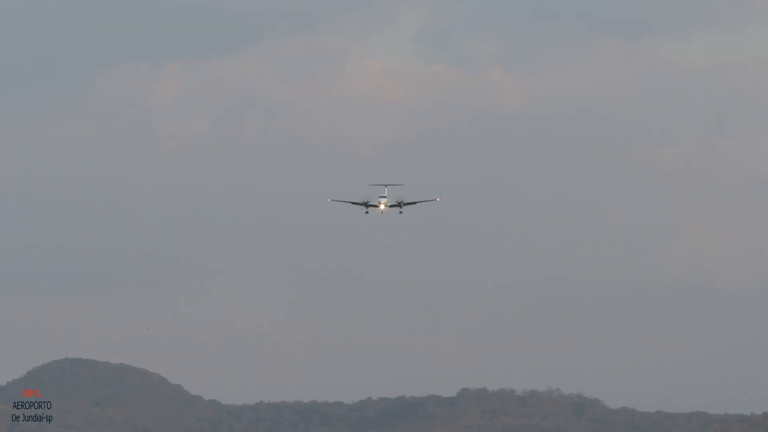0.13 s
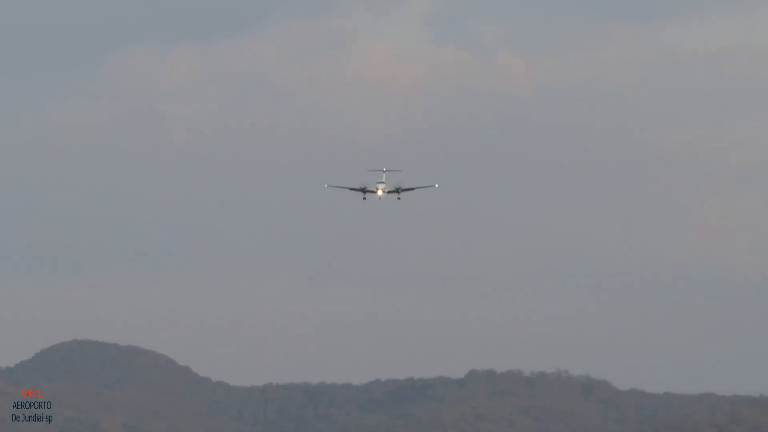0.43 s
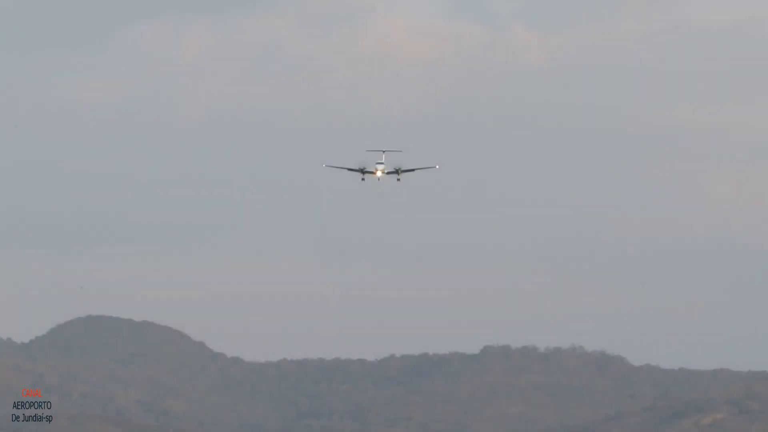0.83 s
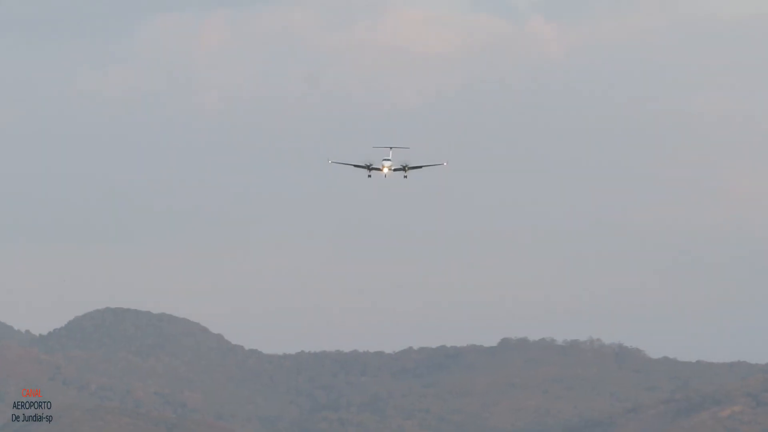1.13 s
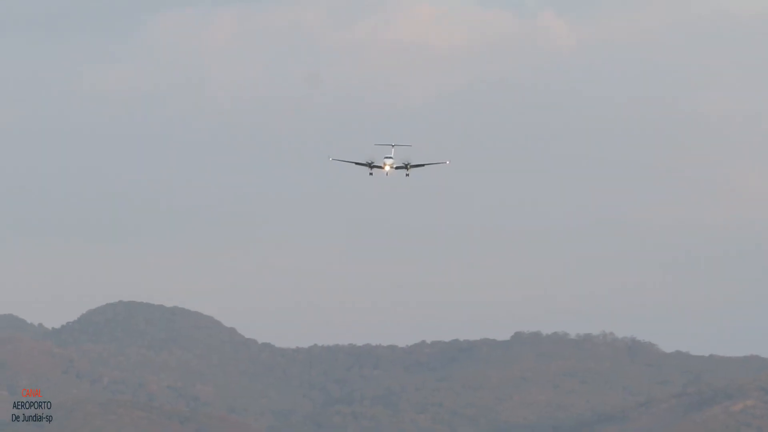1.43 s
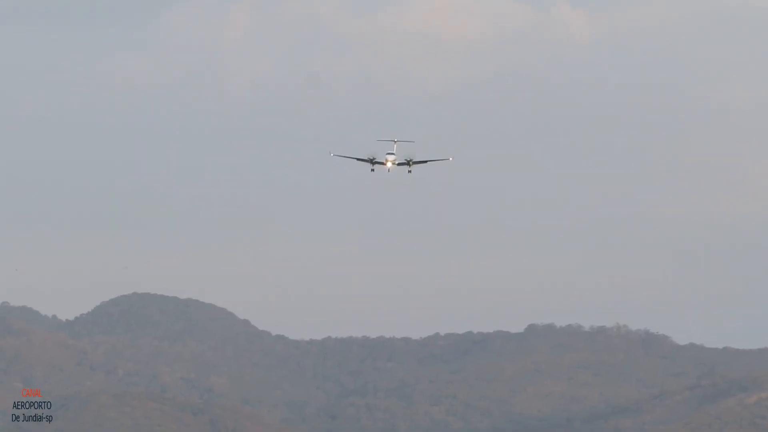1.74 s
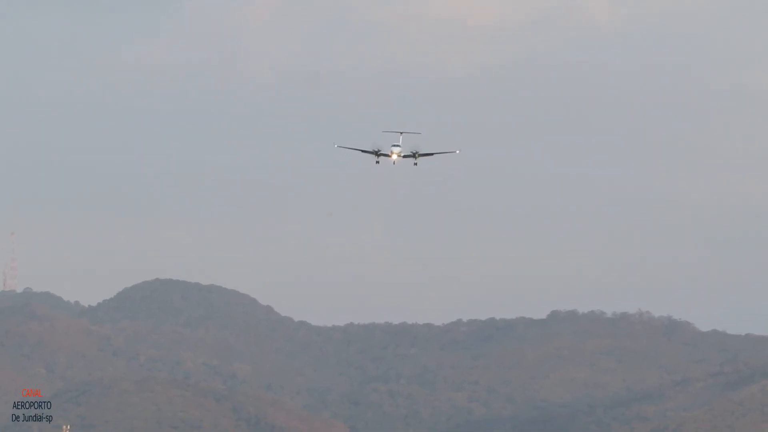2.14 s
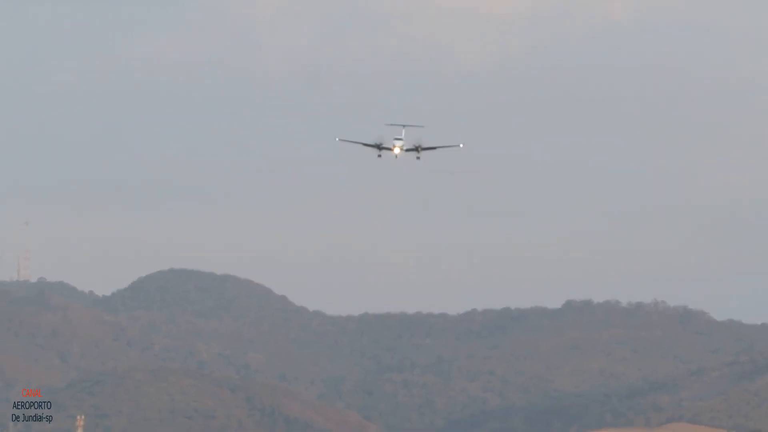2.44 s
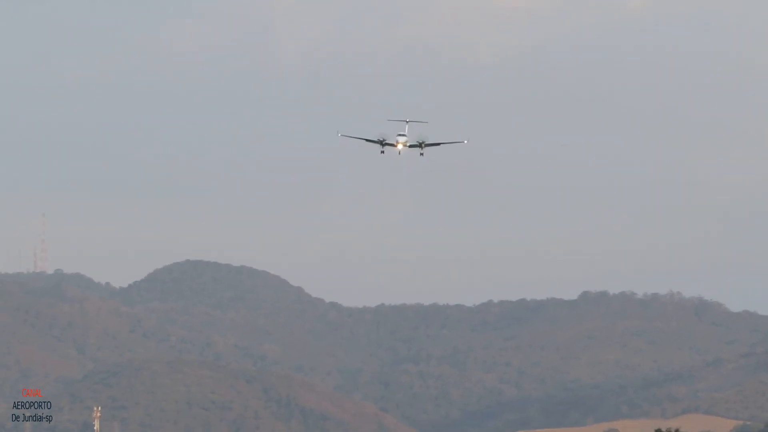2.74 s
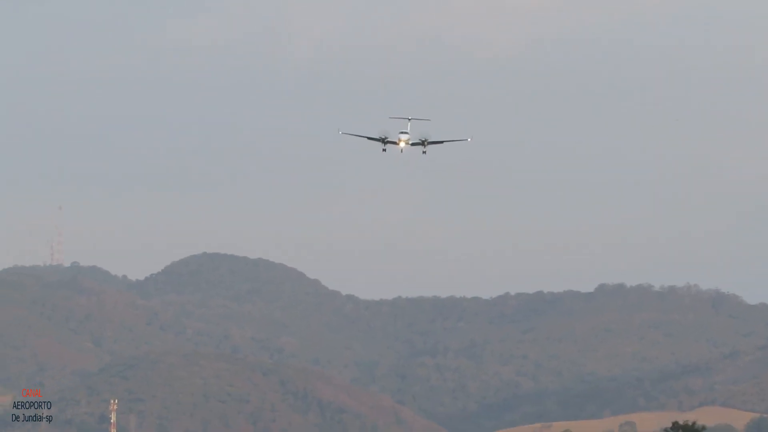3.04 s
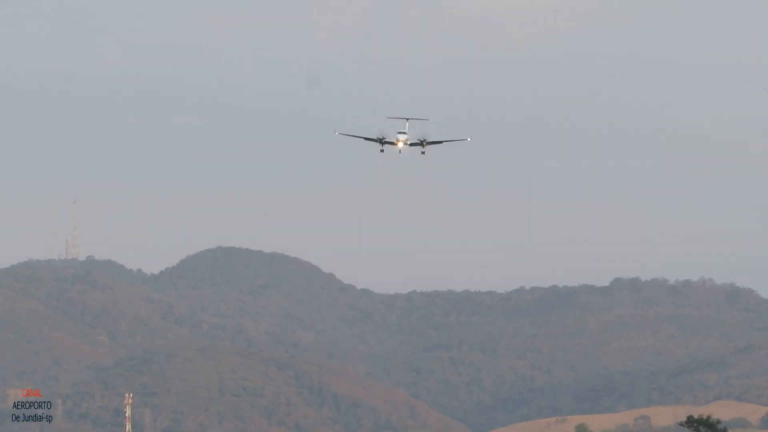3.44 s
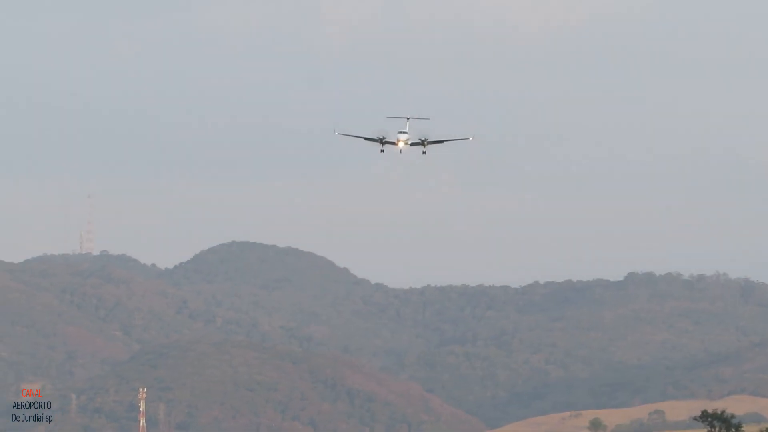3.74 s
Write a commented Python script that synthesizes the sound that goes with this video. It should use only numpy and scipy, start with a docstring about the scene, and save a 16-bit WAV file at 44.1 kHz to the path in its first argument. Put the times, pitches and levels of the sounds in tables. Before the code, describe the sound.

A twin-propeller aircraft approaches outdoors, its broad roar and low rumble starting abruptly and swelling, with blade hum and shimmering turbine whine; faint bird chirps and soft stereo microphone hiss.

```python
"""A broad roar and low rumble start abruptly and come up over the first second and a half: a propeller aircraft.
Roar, rumble and microphone hiss are shaped stereo noise; blade hum and a wavering low hum are gliding sines.
A turbine whine, steady in pitch and shimmering in level, and its octave are sines with drifting level.
A small bird calls twice, sines that climb and slide down with an echo; a very faint high tone lies underneath."""
import sys
import numpy as np
from scipy import signal
from scipy.fft import rfft, irfft, next_fast_len
from scipy.io import wavfile

SR = 44100
rng = np.random.default_rng(int(sys.argv[2]) if len(sys.argv) > 2 else 0)


def file_out(sig):
    """Save sig as 16-bit WAV at sys.argv[1]."""
    # one column per channel
    cols = np.atleast_2d(sig).T
    # limit, then scale
    lim = np.clip(cols, -1, 1)
    pcm = np.round(lim * 32767).astype(np.int16)
    wavfile.write(sys.argv[1], SR, pcm)


N = 171549


def from_db(db):
    """Decibels to amplitude gain."""
    return 10 ** (np.asarray(db) / 20)


def rms_one(x):
    """Scale to unit rms."""
    return x / np.sqrt(np.mean(x ** 2) + 1e-20)


def in_time(rows):
    """Columns of a table after the first (seconds), interpolated to one value per sample."""
    row_s, *columns = np.transpose(rows)
    t_s = np.arange(N) / SR
    return [np.interp(t_s, row_s, column) for column in columns]


def at_hz(points, hz):
    """Read a table on a log-frequency axis."""
    point_hz, values = np.array(points).T
    return np.interp(np.log(hz + 1), np.log(point_hz), values)


def drift(corner_hz):
    """Slow random wander of about unit rms: noise through a double pole at corner_hz."""
    step = 40  # samples per slow sample
    warmup = 2000
    pole = np.exp(-2 * np.pi * corner_hz * step / SR)
    noise = rng.standard_normal(N // step + warmup + 2)
    slow = signal.lfilter([1], [1, -2 * pole, pole * pole], noise)[warmup:]
    return np.interp(np.arange(N) / step, np.arange(len(slow)), rms_one(slow))


def pair(lean_db):
    """Left and right gains, lean_db apart, averaging one."""
    left, right = from_db(lean_db / 2), from_db(-lean_db / 2)
    return np.array([left, right]).reshape(2, -1) * 2 / (left + right)


def tone(hz, lead_rad=0):
    """Stereo sine of rms 1 on a pitch curve; the left phase leads by lead_rad."""
    phase = 2 * np.pi * np.cumsum(hz + np.zeros(N)) / SR
    return np.sqrt(2) * np.sin(phase + lead_rad * np.array([[.5], [-.5]]))


# Stereo image of the noise. Each row: frequency in Hz, left-right correlation.
LIKENESS = [(60, .99), (210, .98), (320, .97), (490, .76), (750, .7), (1150, .65), (1750, .77), (2670, .5),
            (4070, .02), (14400, 0)]
# Each row: frequency in Hz, left minus right in dB.
NOISE_LEAN = [(80, 1), (140, -5.5), (210, 2.5), (320, 0), (490, -5), (750, 2), (1150, -0.5), (1750, 0),
              (14400, 0)]
# Each row: frequency in Hz, phase by which left leads in rad.
NOISE_LEAD = [(130, 0), (430, -.6), (1380, .4), (2240, -.4), (2580, .2), (2930, -.5), (15000, 0)]


def coloured(spectrum, flicker_db):
    """Stereo noise: shared and opposed parts set the correlation; band-limited, flickering, mid rms 1."""
    size = next_fast_len(N)
    hz = np.fft.rfftfreq(size, 1 / SR)
    left_plus = np.array([[1], [-1]])
    mid, side = rfft(rng.standard_normal((2, size)))
    alike = np.clip(at_hz(LIKENESS, hz), -1, 1)
    both = np.sqrt(1 + alike) * mid + np.sqrt(1 - alike) * side * left_plus
    both = both * from_db(at_hz(spectrum, hz))
    both = both * pair(at_hz(NOISE_LEAN, hz))
    both = both * np.exp(.5j * at_hz(NOISE_LEAD, hz) * left_plus)
    in_band = (hz > spectrum[0][0]) & (hz < spectrum[-1][0])
    noise = irfft(both * in_band, size)[:, :N]
    noise = noise * from_db(flicker_db * drift(8))
    return noise / noise.mean(axis=0).std()


# Levels of the roar's three humps. Each row: time in seconds, low, middle and upper level in dB.
ROAR_LEVEL = [(.07, -33.5, -48, -55), (.5, -34, -45.5, -53.5), (1.0, -30, -43, -51.5),
              (1.4, -28, -40.5, -48), (1.8, -27.5, -41, -48.5), (2.2, -28.5, -39.5, -48.5),
              (2.6, -27, -39, -47.5), (3.0, -28.5, -40, -47.5), (3.4, -28.5, -39, -46.5),
              (3.89, -28, -37.5, -45.5)]
# Levels of the low hump's lower flank, the valley above it and a throaty strand inside it.
# Each row: time in seconds, level in dB.
FLANK_LEVEL = [(.07, -47.5), (1.0, -42), (1.8, -42), (2.5, -37.5), (3.2, -32.5), (3.89, -34)]
VALLEY_LEVEL = [(.07, -51.5), (.9, -46.5), (2.0, -46.5), (3.0, -44.5), (3.89, -48)]
STRAND_LEVEL = [(1.0, -53), (1.4, -32.5), (2.1, -38), (2.6, -49)]
# Noise spectra of the six layers. Each row: frequency in Hz, relative density in dB per Hz.
LOW_ROAR = [(80, -1), (110, -10), (150, -8.5), (200, -6.5), (260, -2), (330, 1.5), (420, -5), (520, -15.5),
            (640, -30.5), (800, -59)]
MIDDLE_ROAR = [(600, -15), (750, -5), (850, 1), (950, 2), (1080, -1), (1230, -5.5), (1350, -3),
               (1500, -20.5), (1800, -43)]
UPPER_ROAR = [(1200, -15), (1500, -1), (1750, 1.5), (2100, 0.5), (2600, -7), (3200, -13), (3800, -18),
              (5000, -41)]
FLANK = [(130, -11), (170, -6), (220, 7.5), (270, 5.5), (330, -37)]
VALLEY = [(450, -20), (540, 0), (750, 0), (900, -20)]
STRAND = [(295, -15), (325, 0), (360, -15)]


def roar():
    """Broad noise of propellers and airframe: three humps, a flank, a valley and a strand."""
    low_db, middle_db, upper_db = in_time(ROAR_LEVEL)
    layers = [
        (low_db, LOW_ROAR),
        (middle_db, MIDDLE_ROAR),
        (upper_db, UPPER_ROAR),
        (in_time(FLANK_LEVEL)[0], FLANK),
        (in_time(VALLEY_LEVEL)[0], VALLEY),
        (in_time(STRAND_LEVEL)[0], STRAND),
    ]
    return sum(from_db(db) * coloured(spectrum, flicker_db=.6) for db, spectrum in layers)


# Rumble level. Each row: time in seconds, level in dB.
RUMBLE_LEVEL = [(.07, -39), (.5, -41.5), (1.0, -37.5), (1.5, -38), (2.0, -38.5), (2.5, -37.5), (3.0, -35.5),
                (3.5, -34.5), (3.89, -41)]
# Rumble spectrum. Each row: frequency in Hz, relative density in dB per Hz.
RUMBLE = [(20, -5), (35, 1.5), (48, 9.5), (57, 7), (70, 9), (82, 11.5), (100, 3), (130, -5), (180, -48)]


def rumble():
    """Low noise, 20 to 180 Hz, under the roar."""
    level_db, = in_time(RUMBLE_LEVEL)
    return from_db(level_db) * coloured(RUMBLE, flicker_db=.6)


# Blade hum. Each row: time in seconds, pitch in Hz, level in dB.
BLADES = [(.07, 128.5, -48.5), (.5, 128.3, -37), (1.2, 128, -39.5), (1.6, 127.5, -47), (2.0, 127.2, -42),
          (2.5, 126.8, -33.5), (3.0, 125.8, -33.5), (3.6, 125.5, -32.5), (3.89, 124, -34)]
BLADE_LEAN_DB, BLADE_WAVER_DB, BLADE_WAVER_HZ = 2.5, 1.5, 3.6


def blades():
    """Blade-passing hum: a sine that sinks a little in pitch and wavers in level."""
    hz, level_db = in_time(BLADES)
    level_db = level_db + BLADE_WAVER_DB * drift(BLADE_WAVER_HZ)
    return from_db(level_db) * pair(BLADE_LEAN_DB) * tone(hz)


# Low hum that swells and sinks. Each row: time in seconds, pitch in Hz, level in dB.
THROB = [(.07, 67, -45), (.8, 74, -42), (1.1, 73.2, -44), (1.25, 74.9, -42), (1.5, 75.4, -39),
         (1.8, 77.3, -52), (2.1, 70.8, -40), (2.4, 70.3, -37), (2.57, 70.5, -29), (2.75, 70, -49),
         (2.92, 70, -28), (3.08, 69.3, -46), (3.28, 69, -29.5), (3.43, 68.5, -40), (3.6, 68, -29),
         (3.72, 68, -39), (3.89, 67.8, -29)]


def throb():
    """Wavering low hum under the blades: one sine on pitch and level curves."""
    hz, level_db = in_time(THROB)
    return from_db(level_db) * tone(hz)


# Shimmer of the whine. Each row: time in seconds, level in dB.
WHINE_LEVEL = [(0.07, -41), (0.11, -49), (0.15, -38.5), (0.27, -45), (0.36, -38), (0.46, -42), (0.52, -35),
               (0.65, -46), (0.75, -38), (0.8, -44.5), (0.84, -38), (1.01, -35), (1.1, -40), (1.135, -61),
               (1.18, -41.5), (1.25, -37), (1.57, -31), (1.63, -28), (1.72, -28), (1.8, -50), (1.84, -40),
               (1.86, -33), (1.91, -36), (1.94, -31.5), (2.07, -37.5), (2.17, -28), (2.25, -30),
               (2.41, -39), (2.43, -50), (2.46, -43), (2.51, -63), (2.54, -33.5), (2.57, -34), (2.68, -39),
               (2.81, -34.5), (2.87, -48.5), (2.965, -37), (3.0, -34.5), (3.1, -32.5), (3.15, -34.5),
               (3.19, -45), (3.22, -33), (3.25, -32.5), (3.31, -42), (3.42, -39), (3.48, -31), (3.61, -34),
               (3.67, -36.5), (3.86, -40.5), (3.89, -42)]
# Stereo lean of the whine. Each row: time in seconds, left minus right in dB.
WHINE_LEAN = [(.07, 1), (.4, 8), (.6, 5), (.85, 10), (1.1, 6), (1.5, 9), (2.0, 6), (3.0, 5), (3.3, 10),
              (3.55, 3), (3.89, 2)]
# The octave comes and goes. Each row: time in seconds, level in dB.
OCTAVE_LEVEL = [(0.07, -57), (0.23, -75), (0.46, -73), (0.49, -58), (0.8, -59), (0.84, -74), (0.99, -64),
                (1.04, -75), (1.18, -60), (1.28, -72), (1.32, -56.5), (1.6, -63.5), (2.45, -66),
                (2.62, -56.5), (2.85, -54), (2.87, -75), (3.11, -60), (3.24, -72), (3.3, -52.5),
                (3.42, -57), (3.54, -75), (3.61, -59), (3.86, -68), (3.89, -71)]
WHINE_HZ, WHINE_WANDER_HZ = 1304.3, 1.0
WHINE_LEAD_RAD, WHINE_LEAD_WANDER_RAD = .8, .6
WHINE_FLUTTER_DB, OCTAVE_FLUTTER_DB, FLUTTER_HZ = .7, 2.5, 15
OCTAVE_LEAN_DB = 4


def whine():
    """Turbine tone and octave; moving air bends the path, so the phase drifts between microphones."""
    level_db, = in_time(WHINE_LEVEL)
    lean_db, = in_time(WHINE_LEAN)
    octave_db, = in_time(OCTAVE_LEVEL)
    hz = WHINE_HZ + WHINE_WANDER_HZ * drift(2.42)
    lead_rad = WHINE_LEAD_RAD + WHINE_LEAD_WANDER_RAD * drift(1.36)
    level_db = level_db + WHINE_FLUTTER_DB * drift(FLUTTER_HZ)
    octave_db = octave_db + OCTAVE_FLUTTER_DB * drift(FLUTTER_HZ)
    fundamental = from_db(level_db) * pair(lean_db) * tone(hz, lead_rad)
    octave = from_db(octave_db) * pair(OCTAVE_LEAN_DB) * tone(2 * hz, lead_rad)
    return fundamental + octave


# Microphone hiss as the gain comes up. Each row: time in seconds, level in dB.
HISS_LEVEL = [(.07, -64.5), (.5, -62), (.9, -61.5), (1.4, -58.5), (2.5, -58.5), (3.89, -59)]
# Hiss spectrum. Each row: frequency in Hz, relative density in dB per Hz.
HISS = [(800, -20), (2000, -4), (3500, 0), (7400, -1), (8300, -5), (10500, -7), (12500, -11), (13800, -15),
        (14450, -21), (14550, -30), (15200, -32)]


def hiss():
    """Noise of the microphone pair, nearly uncorrelated in the treble."""
    level_db, = in_time(HISS_LEVEL)
    return from_db(level_db) * coloured(HISS, flicker_db=.2)


def faint_tone():
    """Very faint, steady high sine."""
    return from_db(-93) * tone(13169)


# Bird calls. Each row: time of the top in seconds, fall in seconds, top pitch in Hz, fall rate in Hz per s,
# level in dB before the blur, rise level relative to the top in dB before the envelope's power.
BIRD = [(.318, .19, 7350, 13000, -69, -2), (2.932, .2, 7600, 19000, -66.5, -12)]
BIRD_RISE_S, BIRD_RISE_HZ_PER_S, BIRD_BLUR_HZ = .07, 13000, 60
BIRD_ECHO_S, BIRD_ECHO_DB = .022, -5


def bird():
    """Thin whistle climbs and slides down, broken up by distance; the echo swaps left and right."""
    t_s = np.arange(N) / SR
    calls = 0
    for top_s, fall_s, top_hz, fall_hz_per_s, level_db, rise_db in BIRD:
        from_top_s = t_s - top_s
        climb_hz = -BIRD_RISE_HZ_PER_S * from_top_s
        slide_hz = fall_hz_per_s * from_top_s
        below_top_hz = np.where(from_top_s < 0, climb_hz, slide_hz)
        hz = top_hz - np.clip(below_top_hz, 0, top_hz)
        envelope = np.interp(from_top_s, [-BIRD_RISE_S, -.01, 0, fall_s], [0, from_db(rise_db), 1, 0]) ** .7
        blur = np.array([1 + .5 * drift(BIRD_BLUR_HZ), 1 + .5 * drift(BIRD_BLUR_HZ)])
        calls = calls + from_db(level_db) * envelope * blur * tone(hz)
    echo = np.roll(calls[::-1], int(BIRD_ECHO_S * SR), axis=1)
    return calls + from_db(BIRD_ECHO_DB) * echo


def scene():
    """All sources at the microphone pair."""
    aircraft = roar() + rumble() + blades() + throb() + whine()
    return aircraft + hiss() + faint_tone() + bird()


# Narrow dips. Each row: centre in Hz, width in Hz, depth in dB.
NOTCHES = [(3940, 330, -9), (7868, 260, -22)]
START_S, START_RISE_S = .0582, .002
CUTOFF_HZ = 15140


def record(dry):
    """Two narrow notches (a scaled resonance subtracted), an abrupt start and a steep top cut."""
    out = dry
    for hz, width_hz, depth_db in NOTCHES:
        b, a = signal.iirpeak(hz, hz / width_hz, fs=SR)
        out = out - (1 - from_db(depth_db)) * signal.lfilter(b, a, out)
    rise = np.clip((np.arange(N) / SR - START_S) / START_RISE_S, 0, 1)
    out = out * np.sin(np.pi / 2 * rise) ** 2
    # order 12, 0.5 dB ripple, 70 dB stopband
    top_cut = signal.ellip(12, .5, 70, CUTOFF_HZ, fs=SR, output="sos")
    return signal.sosfilt(top_cut, out)


dry = scene()
out = record(dry)
file_out(out)
```